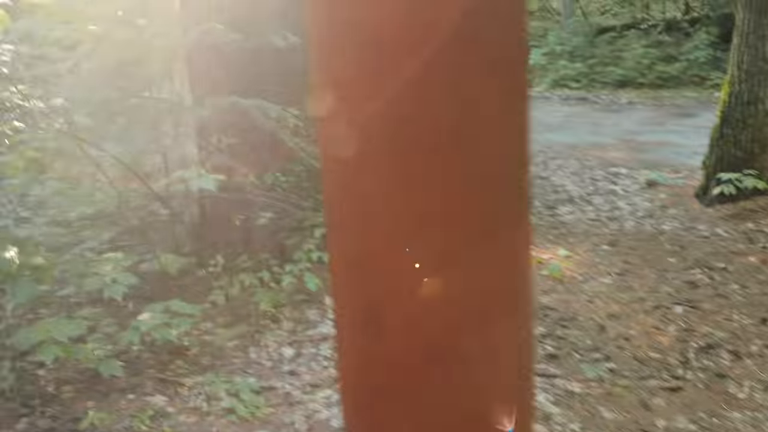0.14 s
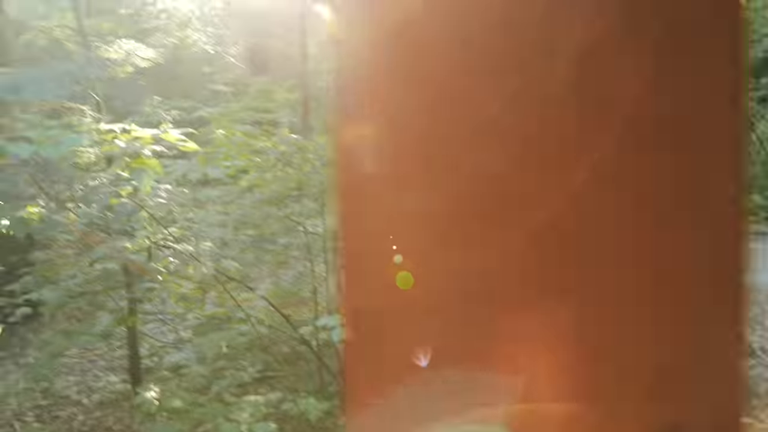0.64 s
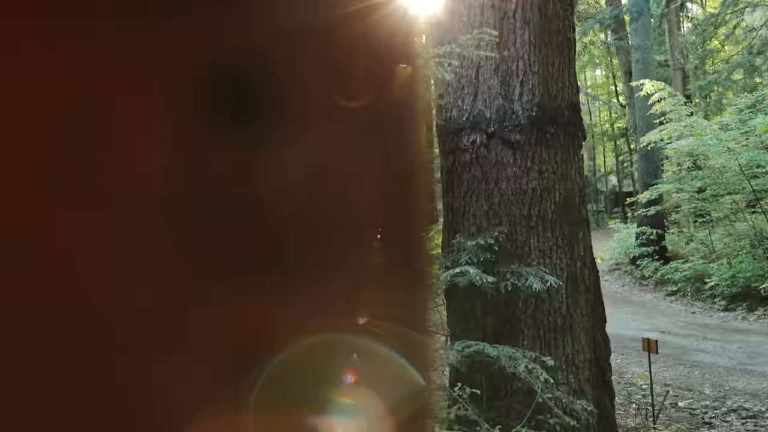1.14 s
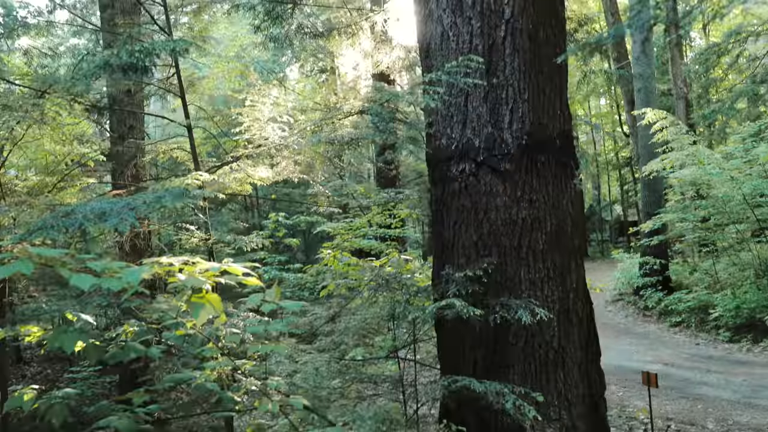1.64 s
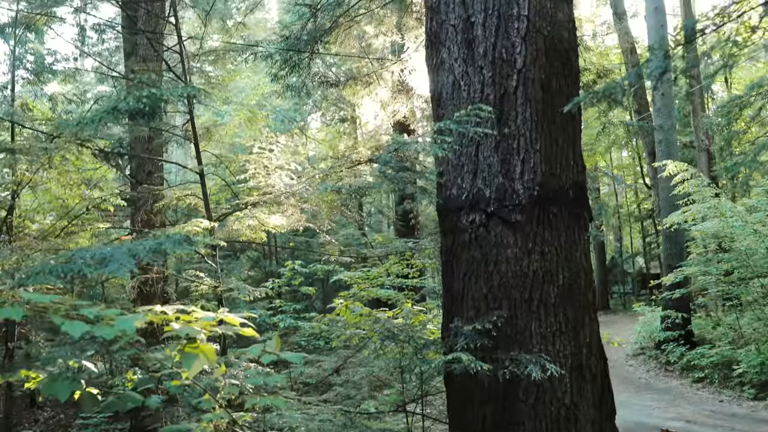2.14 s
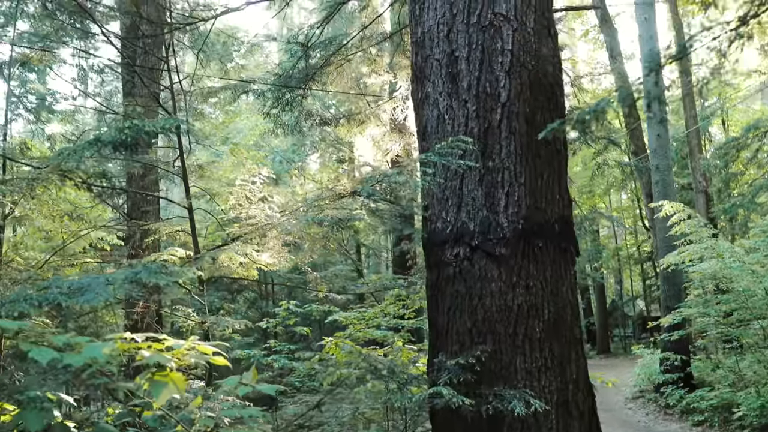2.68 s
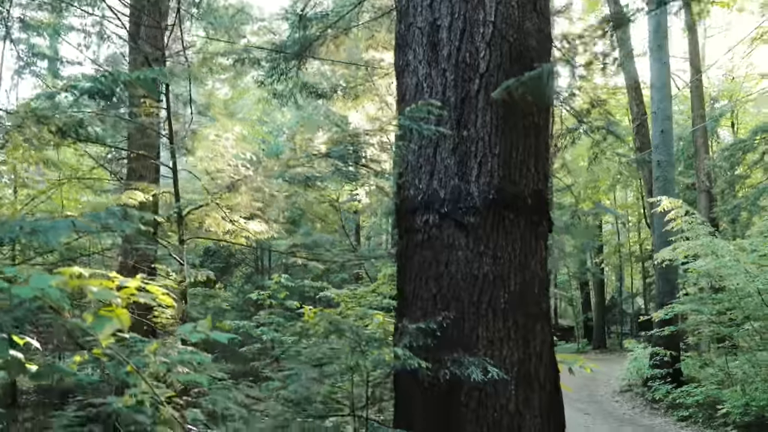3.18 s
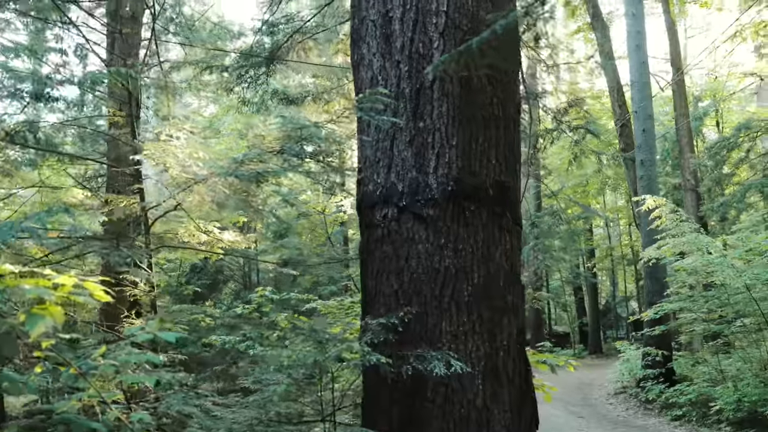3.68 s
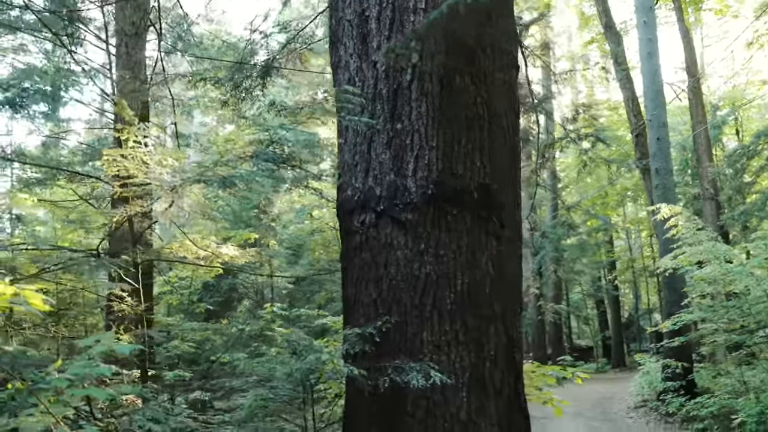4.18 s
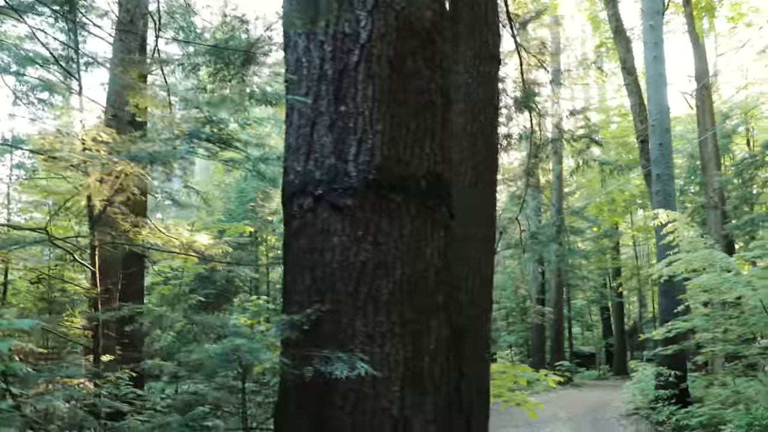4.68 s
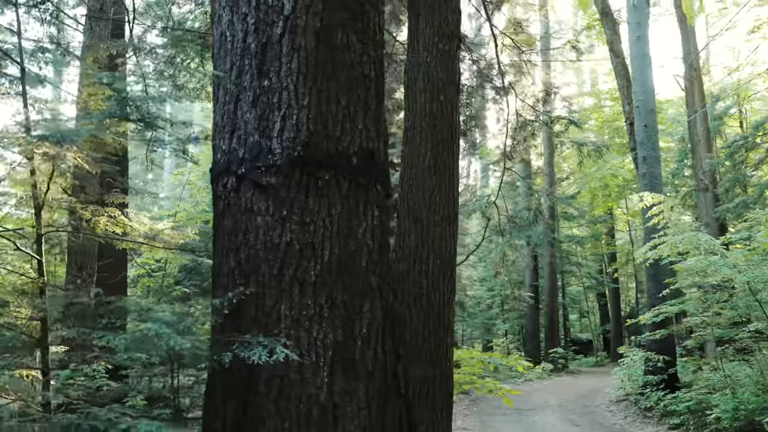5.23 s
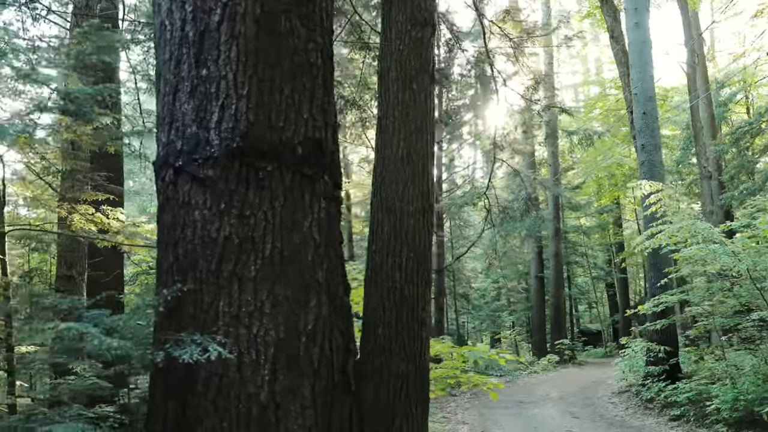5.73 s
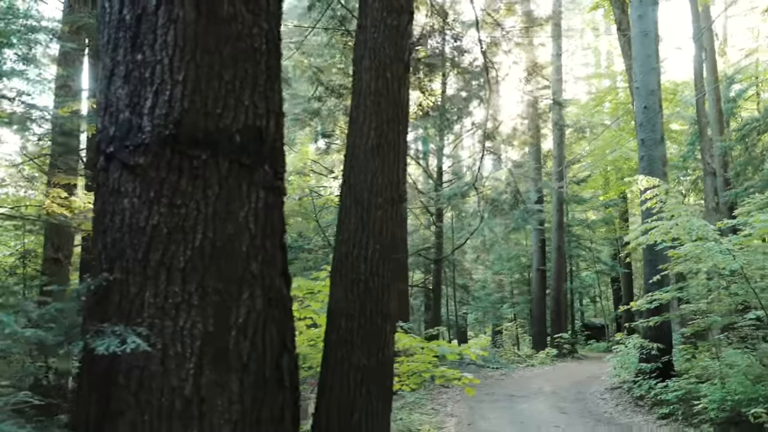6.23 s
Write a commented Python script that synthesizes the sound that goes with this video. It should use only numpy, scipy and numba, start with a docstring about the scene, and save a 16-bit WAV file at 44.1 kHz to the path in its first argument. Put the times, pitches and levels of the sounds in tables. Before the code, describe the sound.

A distant river rushes steadily through trees while a light door slams and rattles, then shoes thud on wooden porch boards and a bird chirps faintly.

```python
"""A river rushes some way off through the trees, heard from a wooden porch: shaped noise mixed with ringing bubbles.
Dry ticks and small scuffs come first; then a light door slams and bounces, each blow ringing decaying modes and a
noisy rattle, and the gain dips a little after loud sound. Shoes then thud on the boards, which ring in low modes,
and scuff on grit, a crackle of filtered noise; a far bird chirps in gliding whistles, and a few ticks still follow."""
import sys
import numpy as np
from scipy import signal
from scipy.fft import rfft, irfft
from scipy.io import wavfile
from scipy.ndimage import uniform_filter1d
from numba import njit

SR = 44100
rng = np.random.default_rng(int(sys.argv[2]) if len(sys.argv) > 2 else 0)


def store_wav(level_fs):
    """Save 16-bit WAV to argv[1]."""
    pcm = np.round(np.clip(np.atleast_2d(level_fs), -1, 1) * 32767)
    wavfile.write(sys.argv[1], SR, pcm.T.astype(np.int16))


def volts_from_decibels(level):
    """Turn decibel levels (scalar or array-like) into linear amplitude factors."""
    exponent = np.asarray(level, float) / 20
    return 10 ** exponent


N = 280035  # length in samples
T = np.arange(N) / SR  # time [s]


def unit(x):
    """Scale to rms 1."""
    return x / np.sqrt(np.mean(x ** 2))


def band(x, hz, width):
    """Band-pass around hz, width in octaves, kept below the top of the range."""
    edges = hz * 2 ** (np.array([-.5, .5]) * width)
    edges = np.minimum(edges, [SR * .44, SR * .48])
    return signal.sosfilt(signal.butter(2, edges, "bandpass", fs=SR, output="sos"), x)


def colour(x, points):
    """Shape a long signal to a spectrum of (frequency [Hz], level [dB]) points."""
    hz, db = np.transpose(points)
    f = np.maximum(np.fft.rfftfreq(len(x), 1 / SR), 1)
    gain = volts_from_decibels(np.interp(np.log(f), np.log(hz), db))
    return irfft(rfft(x) * gain, len(x))


def walk(rate):
    """Smooth random wander with about rate turns a second, rms 1."""
    k = int(SR / rate)
    held = np.repeat(rng.standard_normal(N // k + 1), k)
    smooth = uniform_filter1d(uniform_filter1d(held, k), k)
    return unit(smooth[:N])


def ring(modes):
    """Impulse response of decaying modes; neighbours swing opposite ways, and low ones build up more slowly."""
    t = T[:SR // 2]
    response = 0
    for k, (hz, db, t60) in enumerate(modes):
        decay = 1000. ** (-t / t60)
        build = 1 - np.exp(-t * hz / 0.56)
        response = response + (-1) ** k * volts_from_decibels(db) * np.sin(2 * np.pi * hz * t) * decay * build
    return response


def pushes(rows):
    """A half-sine force for each contact; at equal impulse, longer contacts sound duller."""
    force = np.zeros(N)
    for s, db, ms in rows:
        phase = (T - s) / (ms / 1000)
        push = np.where((phase > 0) & (phase < 1), np.sin(np.pi * phase), 0)
        force += volts_from_decibels(db) * push / push.sum()
    return force


@njit
def bubble(start, hz, cycles, size, glide, n):
    """Each bubble rings a few cycles while its pitch rises."""
    out = np.zeros(n)
    for k in range(len(start)):
        w = 2 * np.pi * hz[k] / SR
        length = int(6 * cycles * SR / hz[k])
        for i in range(min(length, n - start[k])):
            turn = i * hz[k] / SR / cycles  # time in decay constants
            out[start[k] + i] += size[k] * np.exp(-turn) * np.sin(w * i * (1 + glide * turn))
    return out


def river():
    """Countless bubbles blurred by the trees into a rush; half-octave bands swell together and flicker alone."""
    # loudness and brightness as the listener walks out and turns:
    # (time [s], level [dB], brightness [dB per octave])
    path = [(0, -41, 0.3), (.8, -40.3, .35), (1.3, -39.5, -0.8), (2.1, -40.5, .6), (2.5, -40, -0.2),
            (3.1, -38.7, 0.2), (4.2, -39, 0.1), (4.6, -38.3, 0), (6.35, -38.3, 0.25)]
    # spectrum of the rush: (frequency [Hz], relative density [dB per Hz])
    rush_colour = [(20, -17), (60, -12.5), (114, -4), (150, -6.5), (200, -4), (400, -2), (800, -2.5),
                   (2000, -6.5), (2900, -9.5), (3550, -7.5), (4000, -11), (4400, -15.5), (5200, -23),
                   (7700, -36), (10000, -47), (13600, -59)]
    bubbles_per_s = 2500
    start, pitch, strength = rng.random((int(bubbles_per_s * N / SR), 3)).T
    hz = 250 * 2 ** (4.3 * pitch)
    near = bubble((start * N).astype(np.int64), hz, 4.3, hz * volts_from_decibels(6.7 * strength), 0.0606, N)
    # the blurred mass is noise, with the separate bubbles 11.5 dB below it
    rush = colour(rng.standard_normal(N) + volts_from_decibels(-11.5) * unit(near), rush_colour)
    spectrum = rfft(unit(rush))
    octave = np.log2(np.maximum(np.fft.rfftfreq(N, 1 / SR), 1) / 1000)  # octaves from 1 kHz

    s, level_db, tilt_db = np.transpose(path)
    tilt = np.interp(T, s, tilt_db)
    surge_db = 0.68 * walk(3.27)
    out = 0
    for centre in np.arange(-6, 4.5, .5):
        share = np.clip(1 - 2 * np.abs(octave - centre), 0, 1)  # overlapping triangles
        flicker_db = 0.71 * walk(1.6) + 0.58 * walk(9)
        db = np.clip(centre, -2, 2) * tilt + surge_db + flicker_db
        out = out + volts_from_decibels(db) * irfft(spectrum * share, N)
    return volts_from_decibels(np.interp(T, s, level_db)) * out


def bird():
    """Thin gliding whistles, wavering after their way through the leaves."""
    # chirps: (start [s], end [s], start pitch [Hz], end pitch [Hz], level before the waver [dB])
    chirps = [(2.07, 2.15, 4400, 4200, -56), (2.18, 2.217, 4300, 4350, -56),
              (2.838, 2.862, 3150, 3500, -43), (2.858, 2.925, 3980, 4210, -47.5),
              (2.893, 2.94, 3200, 3300, -47), (2.93, 3.035, 4190, 4190, -51),
              (2.97, 2.995, 3350, 3300, -51), (3.07, 3.10, 4200, 4160, -57), (4.68, 4.82, 6000, 5950, -71),
              (4.87, 4.946, 3680, 3560, -47)]
    out = np.zeros(N)
    waver = volts_from_decibels(2.0 * walk(40))
    for t0, t1, hz0, hz1, db in chirps:
        part = np.clip((T - t0) / (t1 - t0), 0, 1)
        hz = hz0 + (hz1 - hz0) * part ** 0.71 + 35 * walk(70)
        whistle = np.sin(2 * np.pi * np.cumsum(hz) / SR)
        shape = np.sqrt(np.sin(np.pi * part) + 1e-9) * (part > 0) * (part < 1)
        out += volts_from_decibels(db) * shape * whistle
    return out * waver


def ticks():
    """Short snaps of decaying noise, each with its own pitch; strong ones spread over a wider band."""
    # dry ticks: (time [s], peak level [dB], centre [Hz])
    snaps = [(.0328, -51, 8800), (.0955, -25, 4800), (.1715, -54, 8500), (.1984, -50, 8500),
             (.2594, -53, 8500), (.267, -57, 8500), (.2997, -53, 8000), (1.6342, -50, 8500),
             (3.8087, -42, 7300), (3.8302, -45, 10000), (4.4045, -39.5, 8000), (5.9678, -54, 10000)]
    out = np.zeros(N)
    t = T[:SR // 50]
    for s, db, hz in snaps:
        width = .82 + .19 * max(db + 40, 0)  # octaves, widening with each dB above -40
        noise = rng.standard_normal(len(t)) * np.exp(-t / 0.0014)
        snap = band(band(noise, hz, width), hz, width)
        i = int(s * SR)
        out[i:i + len(t)] += volts_from_decibels(db) * snap / np.abs(snap).max()
    return out


def thuds():
    """Each landing and the rolling sole push unevenly on the boards, which ring in their modes."""
    # weight landing on the boards: (time [s], blow level [dB], contact time [ms])
    landings = [(2.185, -48, 2.5), (2.585, -41, 1.1), (2.622, -40.5, 1.05), (3.171, -41, 0.4),
                (3.242, -41, .9), (3.299, -46, 0.9), (3.602, -45.5, 1.3), (4.43, -43.5, 7.9)]
    # porch boards: (frequency [Hz], level [dB], time to fall 60 dB [s])
    board_modes = [(67.4, -3.5, 0.21), (112, -7, 0.22), (150.2, 5.5, 0.19), (215, 3.5, 0.079),
                   (292, 5.5, 0.15), (423, .6, .1), (520, -15, 0.065), (1050, -9.5, .06)]
    force = np.zeros(N)
    t = T[:SR // 4]
    for s, db, ms in landings:
        roll_s = .034 + 6.5 * ms / 1000  # the sole rolls on longer after a soft landing
        shuffle = rng.standard_normal(len(t)) * np.exp(-t / roll_s)
        shuffle = 1.05 * shuffle / np.linalg.norm(shuffle)
        shuffle[0] += 1  # the landing itself
        force += signal.fftconvolve(pushes([(s, db, ms)]), shuffle)[:N]
    return signal.fftconvolve(force, ring(board_modes))[:N]


def scuffs():
    """Grit crackles as uneven band-passed noise under soles and settling things, lower under heavier contact."""
    # soles on grit and things settling: (time of peak [s], level [dB], rise [s], fall [s])
    scrapes = [(.098, -45, 0.0033, 0.025), (.235, -70, .03, .03), (.617, -63, .008, .02),
               (.642, -68, .012, .01), (1.995, -76, .004, .005), (2.075, -75, .003, .008),
               (2.12, -68, .02, 0.035), (2.188, -64, 0.0027, .008), (2.225, -74, .003, .006),
               (2.257, -72, .003, .008), (2.31, -73, .003, .008), (2.378, -71, .003, .012),
               (2.452, -77, .003, 0.012), (3.18, -65, .03, 0.027), (3.825, -60, .012, .02),
               (4.41, -63, .005, .04), (4.52, -78, .03, .04), (5.13, -73.5, .03, .03),
               (5.965, -73, .02, .015)]
    out = np.zeros(N)
    grain_db = 2.0 * np.minimum(rng.exponential(size=N), 6)
    grit = rng.standard_normal(N) * volts_from_decibels(grain_db)
    for s, db, rise, fall in scrapes:
        hz = 7800 * 2 ** (-.012 * (db + 65))  # 7800 Hz at -65 dB
        shape = np.exp(-np.where(T < s, ((s - T) / rise) ** 2, (T - s) / fall))
        out += volts_from_decibels(db) * shape * unit(band(grit, hz, 1.5))
    return out


def steps():
    """Shoes thud on the boards and scuff on grit."""
    return thuds() + scuffs()


def rattle(crack_db):
    """One shake of many modes at once: noise bands, each with its own decay, led by a dry crack."""
    # frame and panels, modes too dense to tell apart: (frequency [Hz], level [dB], time to fall 60 dB [s])
    dense_modes = [(102, -20, 0.53), (160, -21, 0.48), (260, -10.5, 0.23), (600, -9.5, 0.25),
                   (1100, -7.5, 0.24), (2350, -9, 0.17), (3620, -6.5, 0.24), (5600, -24, 0.17),
                   (8000, -19.5, .12), (13000, -18.5, 0.29)]
    hz, db, t60 = np.transpose(dense_modes)
    t = T[:SR // 3]
    out = 0
    for centre in 88 * 2 ** np.arange(0, 7.6, .5):
        gain_db = np.interp(np.log(centre), np.log(hz), db)
        decay_s = np.interp(np.log(centre), np.log(hz), t60)
        noise = unit(band(rng.standard_normal(len(t)), centre, 0.68))
        build = 1 - np.exp(-t * centre / 0.84)
        out = out + volts_from_decibels(gain_db) * noise * build * 1000. ** (-t / decay_s)
    return out * (1 + volts_from_decibels(crack_db) * np.exp(-t / 0.0038))


def slam_blows():
    """The door's edge lands along the frame in a quick, slowing run, hardest early, with ever less crack."""
    k = np.arange(7)
    late = .2 * rng.uniform(-1, 1, len(k)) * (k > 0)  # scatter, none on the first contact
    off = (k - 1.8) ** 2  # squared distance from the hardest contact
    s = 1.8117 + .0038 * (k + late) ** 1.25
    db = -13.3 - 1.05 * off
    ms = .14 + .018 * off  # weaker contacts are softer
    crack_db = 6.1 - 1.3 * k
    return np.transpose([s, db, ms, crack_db])


def bounce_blows():
    """The door bounces back; harder, shorter contacts crack more."""
    # bounces: (time [s], blow level [dB], contact time [ms])
    bounces = [(1.859, -24, 0.89), (1.887, -33, .24), (1.908, -33, .5), (1.9325, -29.5, 0.21),
               (1.950, -28, 0.55), (1.970, -31, 0.25), (1.998, -32, 0.64), (2.014, -35, .8),
               (2.028, -36, 1.01), (2.088, -37.5, 0.5)]
    s, db, ms = np.transpose(bounces)
    crack_db = 1.1 - 5.2 * np.log2(ms)  # 1.1 dB at 1 ms, 5.2 dB more for each halving
    return np.transpose([s, db, ms, crack_db])


def door():
    """Every blow rings the leaf's modes and shakes frame and panels in a new way."""
    # door leaf: (frequency [Hz], level [dB], time to fall 60 dB [s])
    leaf_modes = [(69, -20, 0.59), (122.2, -14.5, .4), (189.8, -16, 0.34), (244, -7.5, 0.15),
                  (328, -20, 0.17), (481, -3, 0.12), (743, -14, 0.37), (800, -14, 0.07), (950, -6, .08),
                  (1063, -16.5, 0.36), (1223, -9, 0.054), (1690, -16, 0.087), (1900, -16.5, .1),
                  (2204, -9, 0.11), (2950, -17, .1), (3510, -0.5, 0.055), (3860, -7.5, 0.11)]
    blows = np.vstack([slam_blows(), bounce_blows()])
    out = signal.fftconvolve(pushes(blows[:, :3]), ring(leaf_modes))[:N]
    for *push, crack_db in blows:
        out += signal.fftconvolve(pushes([push]), rattle(crack_db))[:N]
    return out


def scene():
    """All sources at one microphone."""
    return (river() + bird() + ticks() + steps() + door())[None]


@njit
def follow(x, release):
    """Peak follower: jumps up at once, sinks slowly."""
    envelope, held = np.empty(len(x)), 0.
    for i in range(len(x)):
        held = max(abs(x[i]), held * release)
        envelope[i] = held
    return envelope


def gain_control(x):
    """Turns down a little above -13 dB peak and recovers slowly."""
    loud = follow(x[0], np.exp(-1 / (.35 * SR)))  # release 0.35 s
    gain = np.maximum(loud / volts_from_decibels(-13), 1) ** -.12
    return x * uniform_filter1d(gain, size=220)  # smoothed over 5 ms


def top_cut(x):
    """Nothing passes above the cut-off."""
    return signal.sosfilt(signal.butter(12, 16490, fs=SR, output="sos"), x)


def record(dry):
    """The microphone drops the deepest bass, rides its gain, hisses, and loses the very top."""
    heard = signal.sosfilt(signal.butter(2, 45, "highpass", fs=SR, output="sos"), dry)
    heard = gain_control(heard)
    heard = heard + volts_from_decibels(-80) * rng.standard_normal(N)  # hiss
    # a 13 dB step down above 15 kHz, then a steep end at 15.7 kHz
    heard = signal.sosfilt(signal.ellip(5, .2, 13, 15000, fs=SR, output="sos"), heard)
    heard = np.clip(heard, -.98, .98)
    heard = signal.sosfilt(signal.ellip(7, .2, 40, 15700, fs=SR, output="sos"), heard)
    return top_cut(heard)


dry = scene()
out = record(dry)
store_wav(out)
```